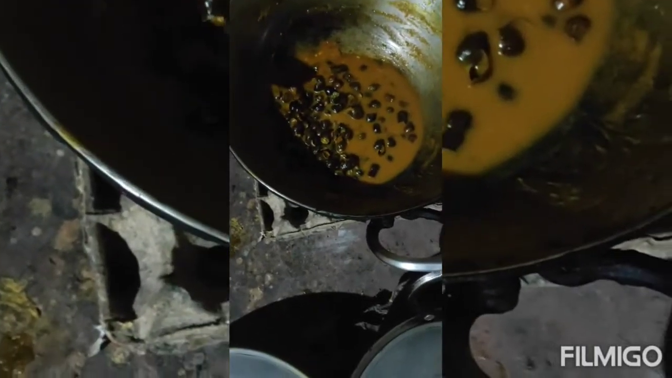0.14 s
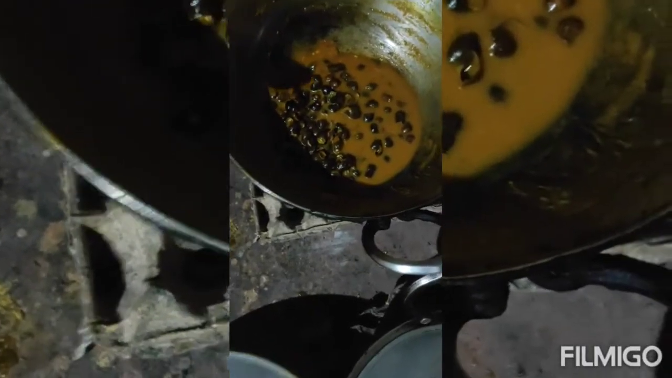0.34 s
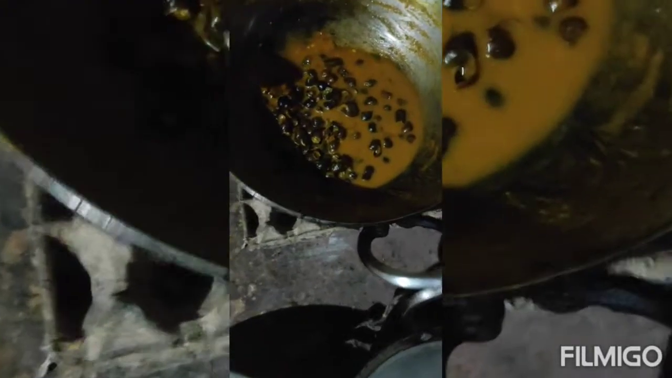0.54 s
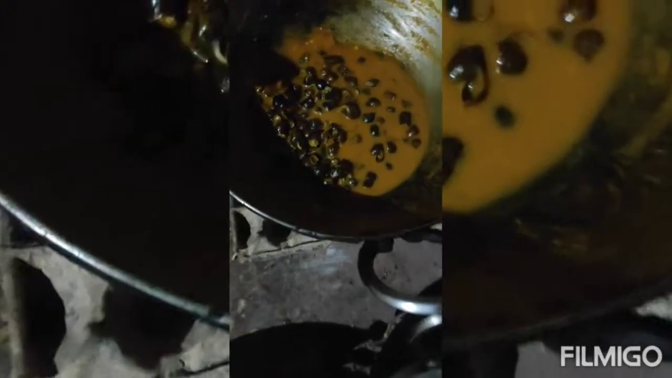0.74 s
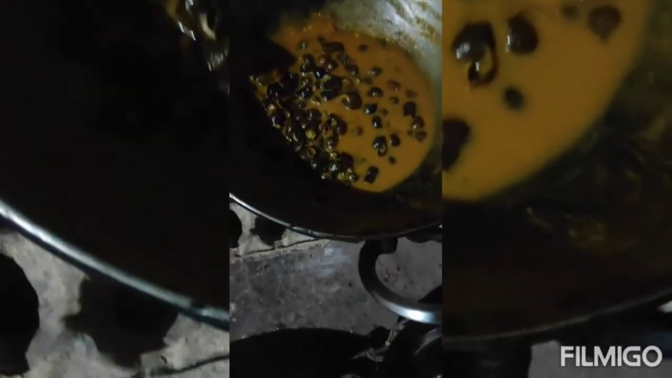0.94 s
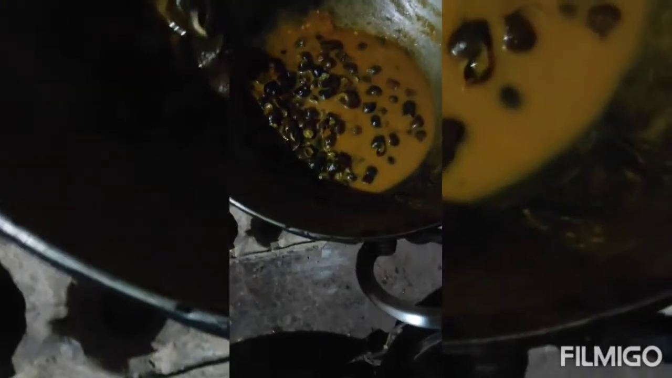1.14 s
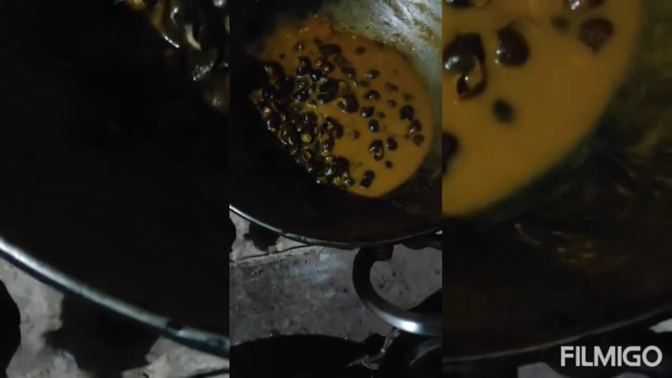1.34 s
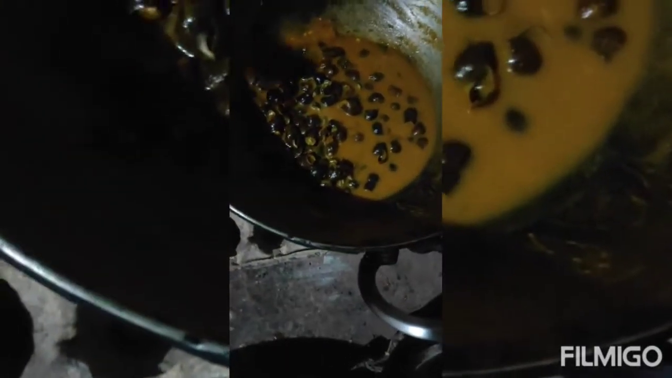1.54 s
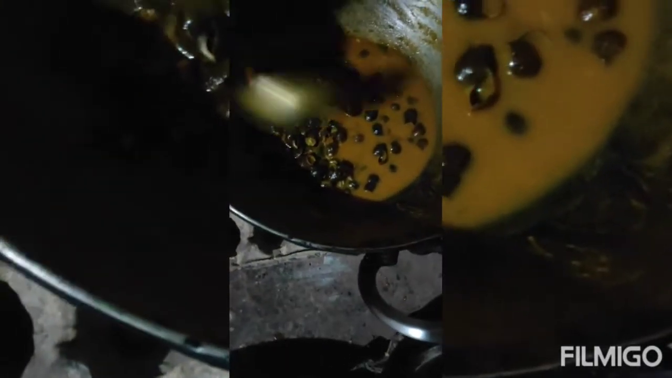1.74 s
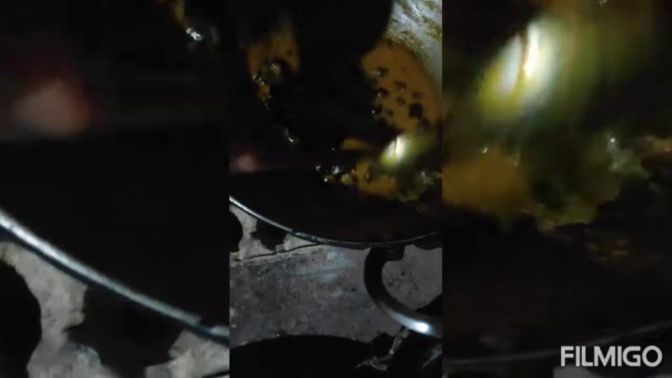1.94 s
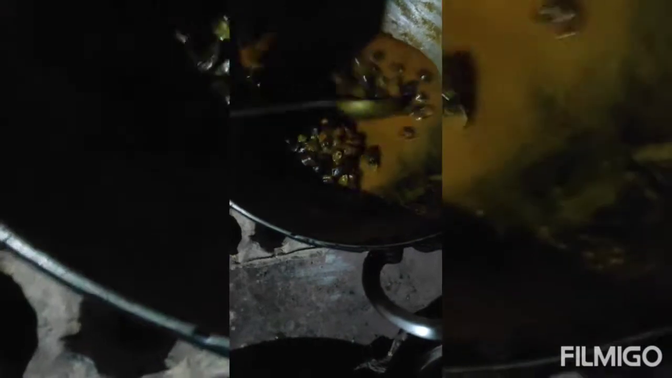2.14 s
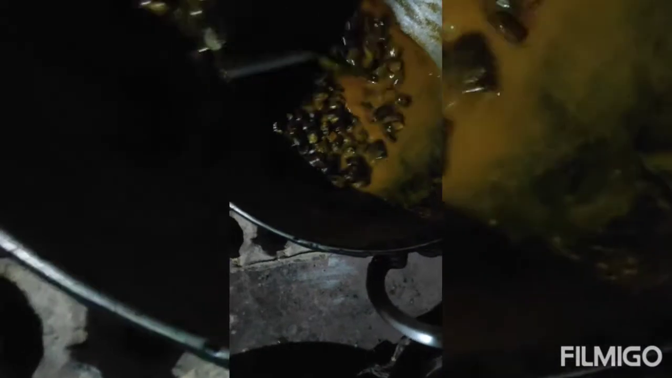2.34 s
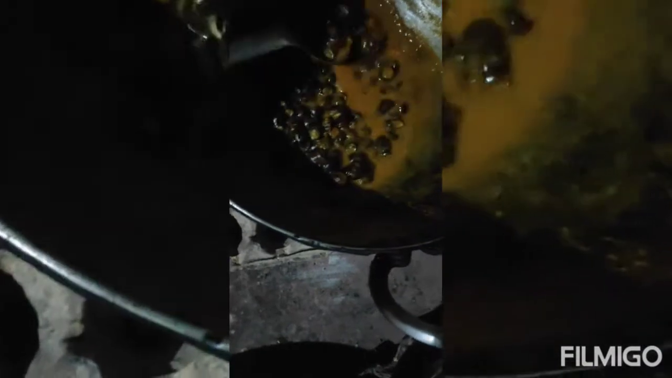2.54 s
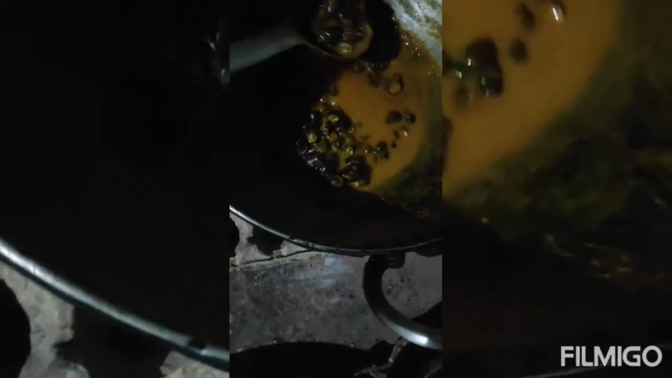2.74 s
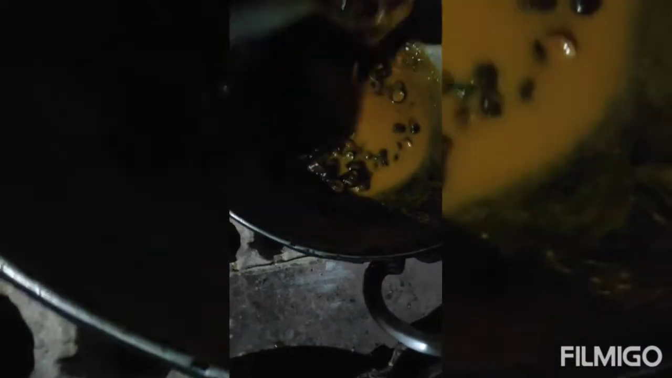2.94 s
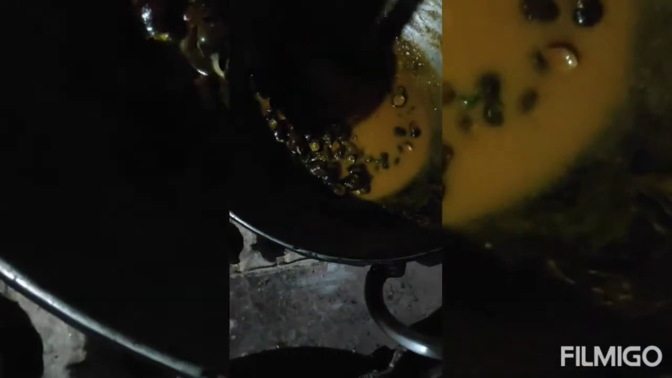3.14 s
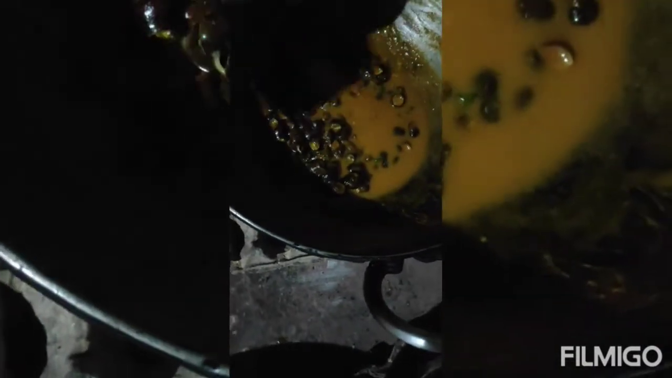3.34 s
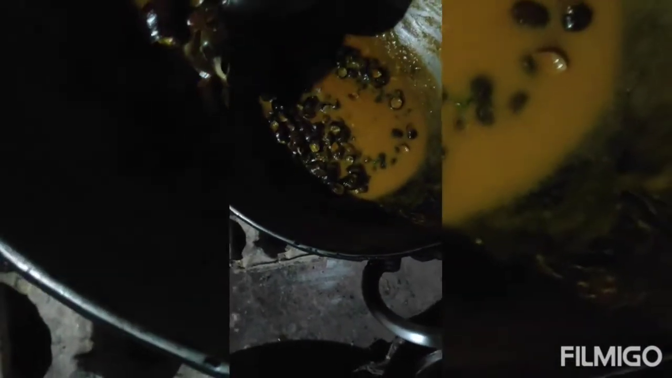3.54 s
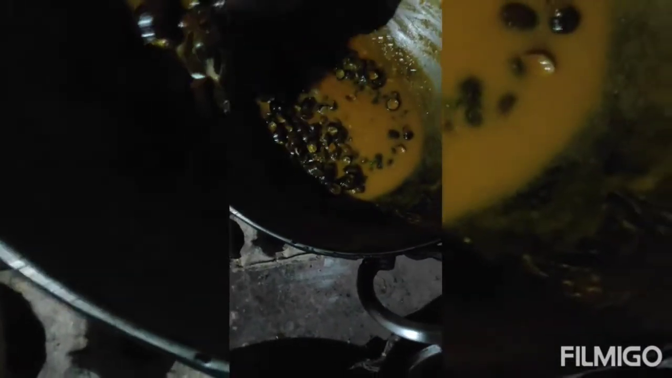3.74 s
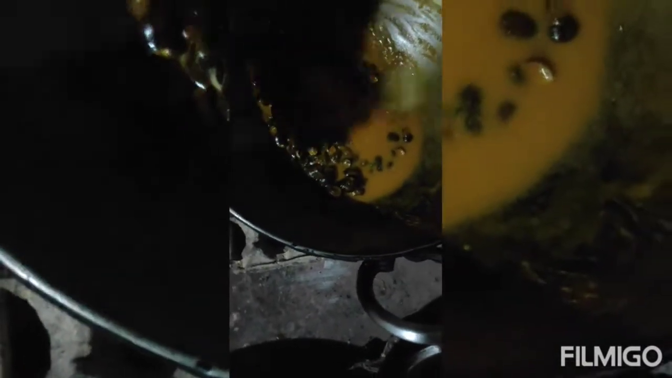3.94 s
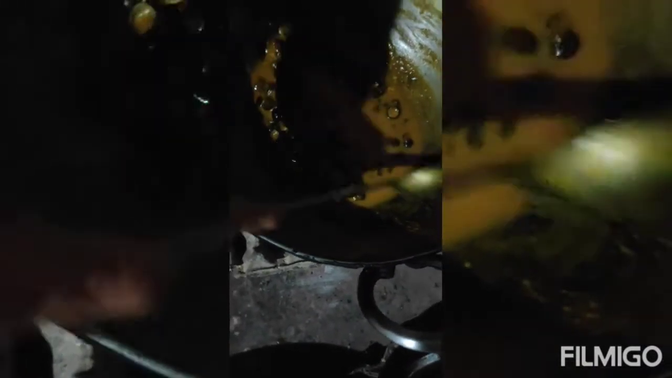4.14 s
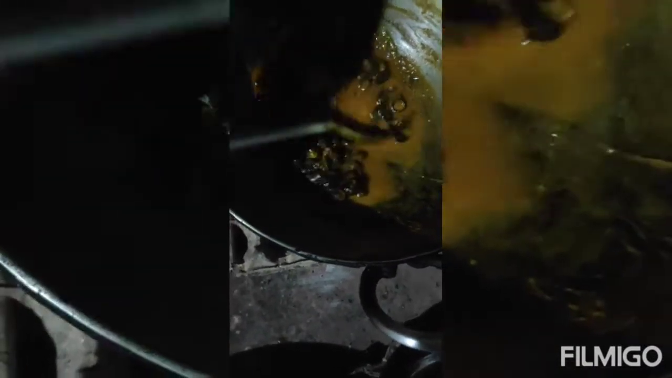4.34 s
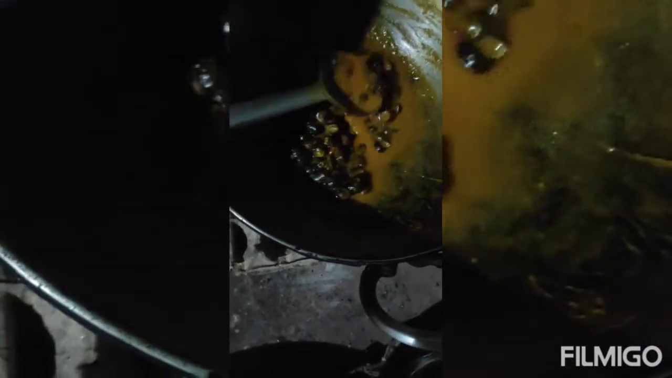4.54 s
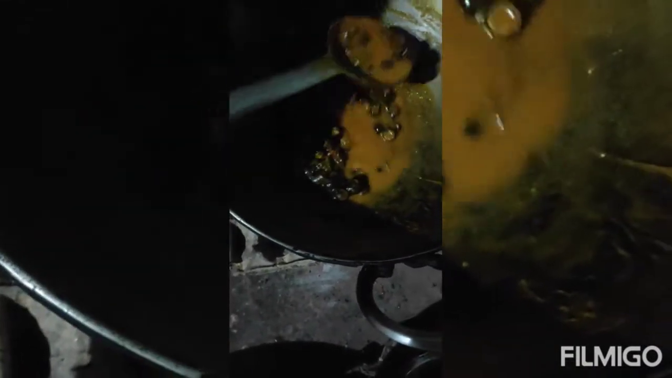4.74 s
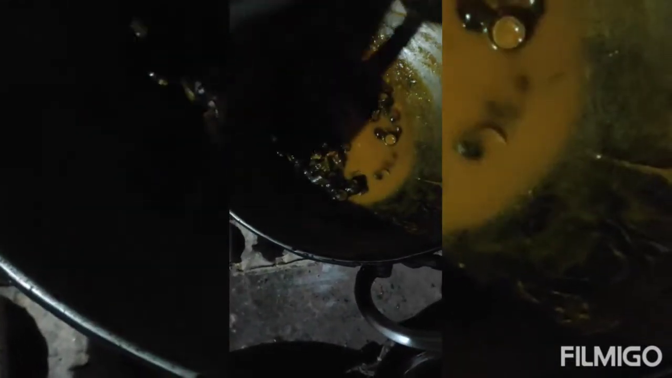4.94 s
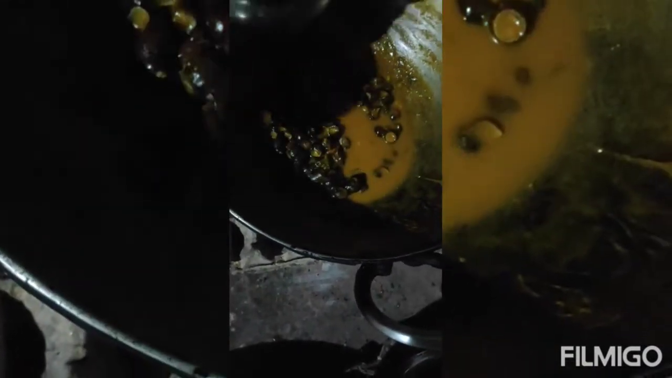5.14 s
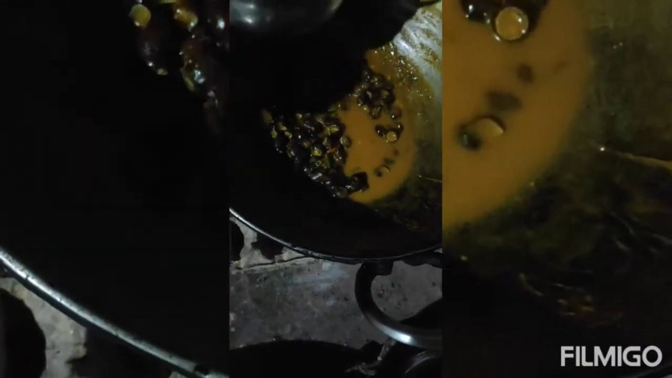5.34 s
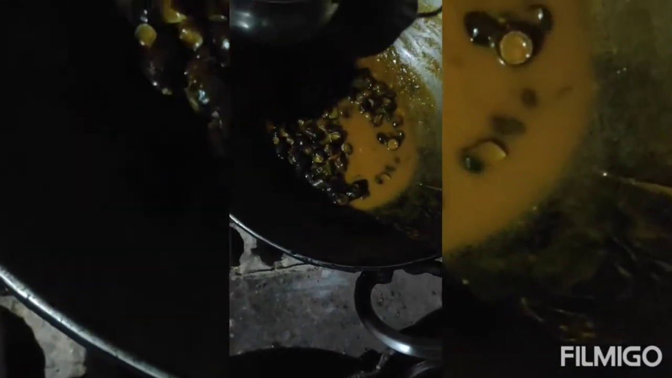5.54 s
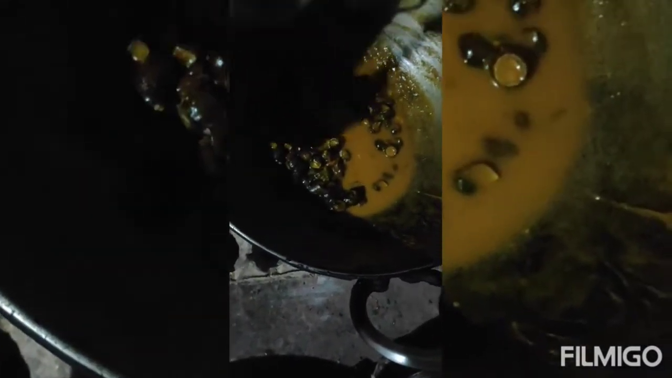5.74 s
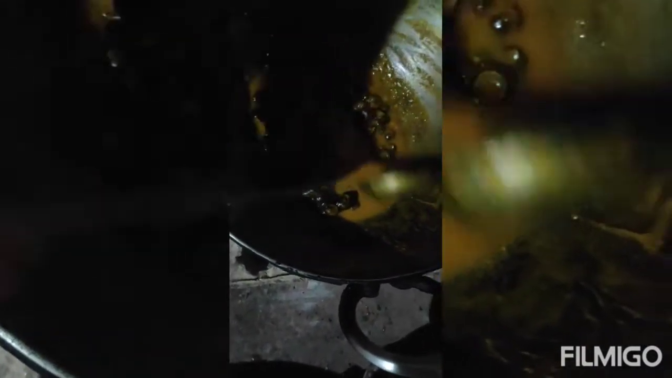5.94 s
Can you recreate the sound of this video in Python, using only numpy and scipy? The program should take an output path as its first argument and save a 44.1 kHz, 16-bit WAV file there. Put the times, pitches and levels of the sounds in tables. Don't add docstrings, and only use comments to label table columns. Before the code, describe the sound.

A metal ladle scrapes and clatters through thick curry in a wide metal pan, two push-and-pull stirs over hissing gas, with distant pot clanks.

```python
import sys
import numpy as np
from scipy import signal
from scipy.fft import rfft, irfft, next_fast_len
from scipy.io import wavfile
from scipy.ndimage import uniform_filter1d

SR = 44100
rng = np.random.default_rng(int(sys.argv[2]) if len(sys.argv) > 2 else 0)


def boost_factor(decibels):
    exponent = np.asarray(decibels, float) / 20
    return 10 ** exponent


def generate_wav(signal):
    frames = np.transpose(np.atleast_2d(signal))
    scaled = np.clip(frames, -1, 1) * 32767
    pcm = np.round(scaled).astype(np.int16)
    wavfile.write(sys.argv[1], SR, pcm)


N = 268128

# (frequency [Hz], density [dB per Hz])
PUSH = [(180, -47.5), (340, -30.5), (488, -9.5), (754, -41), (834, -12), (1270, -22), (1930, -12),
        (3400, -11), (4300, -10), (5200, -11.5), (6200, -5), (7260, -1.5), (8250, -3.5), (9500, -19.5),
        (14900, -29.5), (15700, -25.5), (16500, -70.5)]
TURNS = [
    1.9,
    3.2,
    4.05,
    5.0,
    6.0,
]
# (time [s], peak level [dB], share that rings the wall [dB], struck mode [Hz])
FIRST_PUSH = [(1.9639, -6, -19, 4580), (1.9704, -11, -27, 2424), (1.9818, -4, -16, 880.5),
              (1.9914, -11, -5.5, 475.3), (1.995, -13.5, -1, 850), (1.972, -18, -5.5, 716),
              (2.0445, -17.5, -16.5, 3930), (2.0579, -9.5, -10.5, 3319), (2.066, -6.5, -16, 2427),
              (2.1152, -5.5, -12, 1647), (2.1244, -6, -11.5, 1700), (2.159, -9.5, -14.5, 2866),
              (2.1654, -8.5, -26, 1936), (2.1913, -6.5, -17.5, 2260), (2.2163, -4, -8, 2244),
              (2.305, -13.5, -23.5, 3960), (2.321, -17.5, -5.5, 4010), (2.3377, -16.5, -8.5, 4234),
              (2.3944, -21, -14, 4394), (2.4585, -15, -14, 2960), (2.527, -16.5, -8.5, 4400),
              (2.5548, -12.5, -7, 4300), (2.559, -15.5, -11.5, 4940), (2.582, -19, -5, 4366),
              (2.6336, -19, -8, 3746), (2.711, -13.5, -32, 3740), (2.7774, -15.5, -8.5, 3730),
              (2.7998, -10, -8, 1900), (2.8015, -14, -2, 4000), (2.9788, -11.5, -10, 1860),
              (3.0002, -13, -9, 1880), (3.0508, -21.5, -10.5, 4170)]
# (time [s], peak [dB], wall share [dB], mode [Hz])
FIRST_PULL = [(3.3596, -19, -37.5, 1680), (3.3933, -10.5, -14.5, 4590), (3.4104, -9, -5, 4120),
              (3.454, -13.5, -3, 4120), (3.488, -14, -28, 4200), (3.5324, -8.5, -11.5, 3104),
              (3.536, -15.5, -8.5, 6910), (3.414, -15.5, -5.5, 873), (3.432, -17, -3, 857.5),
              (3.465, -19, -4, 699), (3.65, -20, -7.5, 685.7), (3.5535, -12, -14.5, 662),
              (3.5966, -12.5, -16.5, 682.5), (3.614, -11.5, -9, 2832), (3.6704, -17.5, -16.5, 907),
              (3.9154, -29.5, -28, 1850)]
# (time [s], peak [dB], wall share [dB], mode [Hz])
SECOND_PUSH = [(4.1769, -12.5, -4, 1911), (4.2506, -12, -13, 4030), (4.2724, -12.5, -22.5, 2004),
               (4.3105, -8.5, -13, 1513), (4.315, -14, -9.5, 487.8), (4.3395, -8, -5, 2000),
               (4.3596, -12.5, -4, 1867), (4.4392, -14, -1.5, 2061), (4.4549, -17, -16, 2590),
               (4.5123, -15.5, -27, 4240), (4.5387, -16, -8, 2090), (4.581, -20.5, -2.5, 4434),
               (4.686, -12.5, -6, 1817), (4.702, -21.5, -7.5, 1945), (4.717, -22.5, -12, 1900),
               (4.178, -19, -1, 468)]
# (time [s], peak [dB], wall share [dB], mode [Hz])
SECOND_PULL = [(5.234, -14, -20, 4300), (5.252, -12, -9.5, 3393), (5.278, -24, -32, 4210),
               (5.2913, -10, -16, 3050), (5.3697, -18.5, -3.5, 1300), (5.3866, -14.5, -14.5, 951),
               (5.4019, -16, -6, 1331), (5.435, -13.5, -21.5, 3100), (5.4545, -16.5, -11.5, 1678),
               (5.486, -9.5, -18.5, 3354), (5.503, -13.5, -13, 1650), (5.513, -17, -3, 1029),
               (5.337, -18.5, -8, 1560), (5.312, -20, -2, 878.5), (5.352, -21.5, -3, 874),
               (5.541, -14, -14.5, 3260), (5.8264, -21.5, -20, 4380), (5.8493, -26, -5, 1793)]
BLOWS = FIRST_PUSH + FIRST_PULL + SECOND_PUSH + SECOND_PULL
KNOCK_FIZZ_DB = (-20, -13.5)
PORT_DELAY = 17


def evened(x):
    return x / np.sqrt(np.mean(x ** 2) + 1e-20)


def read(points, hz):
    f, value = np.transpose(points)
    return np.interp(np.log(hz + 1), np.log(f + 1), value)


def add(mix, s, sound):
    part = mix[:, round(s * SR):][:, :sound.shape[1]]
    part += sound[:, :part.shape[1]]


def resonances(modes, hz):
    return sum(boost_factor(db) ** 2 / (1 + ((hz - f) / (width / 2)) ** 2) for f, width, db in modes)


def way(s):
    return (np.searchsorted(TURNS, s) - 1) % 2


def chatter(count=600, ms=3.0):
    shape = (len(BLOWS), count)
    bounces = rng.standard_normal(shape) * (rng.random(shape) < .3)
    bounces[:, 8] = 4.2
    bounces[:, :8] = 0
    bounces = bounces * np.exp(-(np.arange(count) / SR / (.001 * ms)) ** 2.2)
    return 6.876 * bounces / np.linalg.norm(bounces, axis=1, keepdims=True)


def friction():
    grains = rng.standard_normal(N) * boost_factor(3.1 * np.minimum(rng.exponential(1, N), 3.1))
    grains = grains * (rng.random(N) < 4500 / SR)
    roughness = evened(uniform_filter1d(rng.standard_normal(N), 200))
    return evened(grains * boost_factor(1.3 * roughness))


def ladle_force(bursts):
    # (start [s], length [s], pressure [dB], change by the end [dB], depth in the bowl [dB])
    strokes = [(1.96, 0.0682, -14, -11.5, -18), (2.033, 0.2067, -21.5, 1.5, -19.5),
               (2.229, 0.08, -25.5, -11.5, -16), (2.303, 0.0983, -22.5, -2.5, -19.5),
               (2.418, 0.2727, -30.5, -3, -24.5), (2.709, 0.051, -27, -20.5, -15),
               (2.797, 0.046, -28.5, -12.5, -12), (2.984, 0.07, -31, -20.5, -29),
               (3.376, 0.03, -38, 5.5, -28.5), (3.406, 0.1063, -19.5, -5, -13),
               (3.53, 0.126, -25.5, -0.5, -20), (3.651, 0.075, -27.5, -20, -15.5),
               (3.908, 0.085, -35.5, -18, -12.5), (4.17, 0.074, -24, -9.5, -15.5),
               (4.248, .11, -18, -1, -22), (4.355, 0.2036, -17.5, -14, -24.5),
               (4.561, 0.0886, -35.5, -5.5, -19), (4.686, 0.0715, -33, -28.5, -17.5),
               (5.233, 0.067, -25.5, 5.5, -20.5), (5.298, 0.166, -24, -16, -14),
               (5.481, 0.1796, -21, -17, -23), (5.663, 0.029, -27, -19, -17.5)]
    slide_wall_db, slide_fizz_db = (-10.5, -11), (-16.5, -9.5)
    knock_hum_db = (-25.5, -21.5)
    hum_share = .6
    grip_s = 0.0036
    fizz_per_db, firm_db = 0.79, -13.5
    follow = np.array([[1], [.7], [0.878], [1.3]])
    grit = friction()
    force = np.zeros((4, N))
    for s, length, db, change_db, depth_db in strokes:
        t = np.arange(0, length, 1 / SR)
        parts_db = np.array([[0], [depth_db], [slide_wall_db[way(s)]], [slide_fizz_db[way(s)]]])
        pressure_db = db - 1.5 + parts_db + follow * change_db * t / length
        add(force, s, np.minimum(t / grip_s, 1) * boost_factor(pressure_db))
    force *= grit
    for (s, db, ring, hz), burst in zip(BLOWS, bursts):
        hum_db = knock_hum_db[way(s)] + hum_share * ring
        fizz_db = KNOCK_FIZZ_DB[way(s)] + fizz_per_db * (db - firm_db)
        parts_db = np.array([[0], [hum_db], [ring - 3.5], [fizz_db]])
        add(force, s - .001, burst * boost_factor(db + 0.5743 + parts_db))
    return force


def pan_rings(colour, strong, count=500, spots=8, size=2200):
    # (frequency [Hz], t60 [s])
    damping = [(400, 0.06), (2000, .035), (7000, 0.016), (14000, 0.0076)]
    parts_hz = (150, 1200, 4000, 9500, 16500)
    shift_rad, overlap = .6, .12
    dense_hz = np.linspace(300, 16500, num=count) + rng.uniform(-15, 15, count)
    hz = np.r_[dense_hz, [m[0] for m in strong]]
    t60 = np.r_[read(damping, dense_hz) * rng.uniform(.5, 1.6, count), [2.2 / m[1] for m in strong]]
    boost_db = np.r_[np.zeros(count), [m[2] for m in strong]]
    height = boost_factor(read(colour, hz) + boost_db) / np.sqrt(t60)
    t = np.arange(size) / SR
    modes = height[:, None] * np.exp(np.outer(2j * np.pi * hz - np.log(1000) / t60, t))
    near = np.exp(2j * np.pi * rng.random((spots, len(hz))))
    near[:, count:] = np.exp(1j * np.pi * np.arange(spots)[:, None] / 2)
    lag_rad = 2 * np.pi * hz * np.minimum(hz / 1100, 1) * 0.0003945
    patch_rad = np.minimum(hz / 900, 2.5) * rng.standard_normal(len(hz))
    far = near * np.exp(1j * (patch_rad - lag_rad))
    far = far * np.exp(1j * shift_rad * np.minimum(hz / 2000, 1) * rng.standard_normal(near.shape))
    blurred_hz = hz * np.exp(overlap * (hz < 6500) * rng.standard_normal(len(hz)))
    part = np.digitize(np.clip(blurred_hz, parts_hz[0], parts_hz[-1] - 1), parts_hz)
    body_hum_wall_fizz = (3, 1, 2, 4)
    rings = np.array([[((w * (part == k)) @ modes).imag for w in (far, near)] for k in body_hum_wall_fizz])
    rings *= 1 - np.exp(-t / 0.00064)
    return (rings / np.linalg.norm(rings, axis=-1, keepdims=True)).transpose(2, 0, 1, 3)


def pan(force, rings, dwell_s=.022):
    size = next_fast_len(force.shape[1] + rings.shape[-1])
    travel = np.arange(force.shape[1]) / SR / dwell_s
    out = 0
    for k, spot in enumerate(rings):
        away = (travel - k + len(rings) / 2) % len(rings) - len(rings) / 2
        share = np.cos(np.pi / 2 * np.clip(away, -1, 1))
        out = out + (rfft(force * share, size)[:, None] * rfft(spot, size)).sum(0)
    return irfft(out, size)


def struck_mode(burst, t, t60, hz, db):
    mode = boost_factor(-60 * t / t60) * np.sin(2 * np.pi * hz * t)
    ping = np.convolve(burst, mode)
    ping *= boost_factor(db) / abs(ping).max()
    return np.array([np.roll(ping, PORT_DELAY), ping])


def pings(bursts, t60=0.033):
    out, t = np.zeros((2, N)), np.arange(2000) / SR
    for (s, db, ring, hz), burst in zip(BLOWS, bursts):
        mode_t60 = t60 / (hz / 2500) ** .5
        add(out, s - .001, struck_mode(burst, t, mode_t60, hz, db + ring - 5.0))
    return out


def ticks(bursts):
    # (time [s], peak level [dB], treble mode
    # [Hz])
    catches = [(1.9709, -1.5, 7075), (1.9902, -3, 8310), (2.04, -13.5, 7540), (2.065, -7.5, 7860),
               (2.0803, -7.5, 7360), (2.0846, -12.5, 8200), (2.1005, -13.5, 7190), (2.125, -5.5, 6520),
               (2.1286, -13, 7540), (2.1329, -12.5, 7390), (2.1663, -8, 6780), (2.1703, -5.5, 6860),
               (2.202, -16, 7480), (2.2115, -10, 7830), (2.2154, -1, 6600), (2.2629, -21.5, 7070),
               (2.3049, -6, 7290), (2.3515, -10, 7130), (2.3727, -13, 7084), (2.4773, -17, 7460),
               (2.502, -15, 6000), (2.5166, -16, 5250), (2.5954, -13.5, 7595), (2.6269, -24, 7520),
               (2.7937, -9, 7140), (3.0118, -18, 7690), (3.4661, -11.5, 7320), (3.5913, -14, 7600),
               (3.5971, -8.5, 7750), (3.6053, -13, 5780), (3.6351, -13.5, 7390), (3.646, -14.5, 7140),
               (3.774, -24.5, 7160), (3.9239, -22, 8600), (4.1896, -15, 5600), (4.1996, -24, 7660),
               (4.2462, -16, 7320), (4.2544, -4.5, 8220), (4.2716, -8.5, 7680), (4.2881, -9, 7840),
               (4.3245, -12, 6510), (4.3397, -9.5, 6500), (4.3525, -10.5, 7400), (4.3592, -13, 7160),
               (4.3966, -10.5, 6980), (4.4113, -16, 7200), (4.4517, -16.5, 7140), (4.5906, -21.5, 7220),
               (4.6014, -21, 7500), (4.6091, -24, 7280), (4.655, -23.5, 7260), (4.694, -15.5, 7700),
               (4.7069, -20.5, 7100), (5.4748, -23.5, 7680), (5.4942, -11, 7090), (5.5081, -13.5, 7130),
               (5.5524, -13, 8560), (5.6012, -15, 6970), (5.64, -29, 7040), (5.6772, -25, 7290),
               (2.1145, -6, 8400), (2.3215, -14, 5200), (2.3456, -16, 7800), (2.4423, -19, 6770),
             (2.4577, -6, 5000), (2.4605, -13, 7450), (2.4992, -16, 5000), (2.5257, -19, 8190),
             (2.5585, -13, 8200), (2.582, -14, 7690), (2.6628, -22, 7640), (2.7117, -10, 7600),
             (2.7766, -11, 7480), (2.9788, -9, 8500), (3.0002, -8, 7500), (3.3965, -8, 7180),
             (3.4125, -7, 7470), (3.4541, -13, 8560), (3.489, -13, 7220), (3.5309, -8, 6860),
             (3.6681, -12, 7250), (4.1758, -9, 5630), (4.2725, -3.5, 7880), (4.4385, -11, 7880),
             (4.5126, -12, 7520), (4.6855, -12, 7500), (4.6885, -8, 6000), (5.2173, -23, 7800),
             (5.2328, -4.5, 8700), (5.2767, -11, 6790), (5.2892, -8, 8260), (5.3231, -16, 7260),
             (5.336, -19, 8200), (5.368, -11, 7860), (5.4019, -13, 7660), (5.4345, -8, 6210),
             (5.4847, -4, 8620), (5.5015, -11, 7200), (5.6648, -24, 7160), (5.555, -14, 7400),
             (5.8264, -20, 7300)]
    catch_s, mode_t60 = 0.0017, .012
    force, out, t = np.zeros((4, N)), np.zeros((2, N)), np.arange(600) / SR
    for k, (s, db, hz) in enumerate(catches):
        burst = bursts[k % len(bursts)] * np.exp(-t / catch_s)
        parts_db = np.array([[-3.0], [-36], [-15], [KNOCK_FIZZ_DB[way(s)] - 2.5]])
        add(force, s, burst * boost_factor(db + parts_db))
        add(out, s, struck_mode(burst, t, mode_t60, hz, db - 7.0))
    return force, out


def stirred_pan():
    # (frequency [Hz], density [dB per Hz])
    pull = [(180, -60), (300, -33), (587, -32), (649, -18.5), (877, -5), (1060, -14.5), (2650, -18.5),
            (3140, -16), (3840, -12.5), (5500, -7), (7020, 4.5), (8580, 3.5), (10300, -8), (15200, -12),
            (16500, -33.5)]
    # (frequency [Hz], width [Hz], level [dB])
    push_modes = [(213.7, 81, 18.5), (447, 55, 9), (489.6, 70, 6.5), (850, 70, 5.5), (1509.6, 140, 13),
                  (1880, 190, 14), (2131.3, 100, 7)]
    # (frequency [Hz], width [Hz], level [dB])
    pull_modes = [(655.4, 70, 4.6), (870.3, 100, 3), (1012.5, 58, 3), (1700, 39, 4.9), (3120, 60, 2.8)]
    # (time [s], left over right [dB])
    swing = [(2.2, 2.5), (2.4, -2.5), (3.0, 0), (3.6, -0.5), (4.3, 3.5), (4.7, -1.13), (5.398, 1.94),
             (5.5, 3.5)]
    bursts = chatter()
    catch_force, catch_rings = ticks(bursts)
    ladle = pings(bursts) + catch_rings
    force = ladle_force(bursts) + catch_force
    ways = pan_rings(PUSH, push_modes), pan_rings(pull, pull_modes)
    for k, (start, end) in enumerate(zip(TURNS, TURNS[1:])):
        add(ladle, start, pan(force[:, round(start * SR):round(end * SR)], ways[k % 2]))
    ladle = signal.lfilter(*signal.butter(2, 170, "high", fs=SR), ladle)
    swing_db = np.interp(np.arange(N) / SR, *np.transpose(swing))
    return ladle * boost_factor(np.array([swing_db, -swing_db]) / 2)


def kitchen(x):
    # (frequency [Hz], t60 [s])
    room_decay = [(300, 0.23), (2000, 0.36), (7000, 0.27), (14000, 0.11)]
    taps = np.zeros((2, SR // 2))
    slots = np.arange(260, SR // 2 - 20, 20)
    at = slots + rng.integers(0, 20, (2, len(slots)))
    np.put_along_axis(taps, at, rng.choice([-1., 1.], at.shape), 1)
    hz, t, z = signal.stft(taps, SR, nperseg=128)
    decay = boost_factor(-60 * t / read(room_decay, hz)[:, None])
    tail = signal.istft(z * decay, SR, nperseg=128)[1]
    return signal.fftconvolve(x, tail / np.linalg.norm(tail[0]), axes=1)[:, :N]


def clank(s, db, t60, modes):
    size = 2 ** 15
    hz, t = np.fft.rfftfreq(size, 1 / SR), np.arange(size) / SR
    wide = boost_factor(read(PUSH, hz) - 9.5) ** 2 / (1 + (hz / 8800) ** 12)
    power = uniform_filter1d(resonances(modes, hz), 28) + wide
    lines = rfft(rng.standard_normal((2, size))) * np.sqrt(power)
    lows = hz < 3500
    noise = irfft(lines * ~lows) + irfft(lines * lows) * boost_factor(60 * t / t60 * 0.22)
    return s, boost_factor(db - 60 * t / t60) * (1 - np.exp(-t / 0.0035)) * noise / irfft(lines).std()


def far_pots():
    # (time [s], level [dB], t60 [s])
    strikes = [
        (.005, -29.5, 0.5),
        (.505, -35.5, .8),
        (0.739, -34.5, 0.0153),
        (1.112, -20.5, 0.3417),
        (1.727, -40.5, 0.24),
        (5.743, -36.5, 0.46),
        (6.037, -35.5, 9),
    ]
    # (frequency [Hz], width [Hz], level [dB])
    pots = [
        [(2492.5, 60, -4.5), (4140, 90, -10), (5320, 220, -12.5), (6743, 22, 0.5), (7824, 250, 0)],
        [(1118, 86, -7.5), (1300, 67, -4.5), (1880, 50, -1), (2090, 50, -3), (7190, 190, -7)],
        [(5960, 32, -3), (7750, 70, -9.5)],
        [(2514, 50, 1.5), (2620, 100, 2.5), (2960, 18, 1.5), (3313, 16, -1), (1299, 64, -8.5), (4120, 60, -11),
         (5243, 200, -6), (5620, 260, -5), (6500, 300, -13), (7850, 160, -3), (8250, 160, -5), (1900, 135, -12)],
        [(7050, 86, 4), (8200, 34, 1.7)],
        [(1020, 170, -0.5), (1250, 63, 6.5), (2156, 190, -3), (2617, 100, -3)],
        [(2042, 48, 4), (4840, 135, -5.5), (7760, 71, 5.5), (9030, 32, 5.5)],
    ]
    out = np.zeros((2, N))
    for row, modes in zip(strikes, pots):
        add(out, *clank(*row, modes))
    return out


def burner():
    # (frequency [Hz], coherence [0..1])
    hiss_same = [(60, 1), (290, 0.71), (700, 0.27), (1500, 0.045)]
    # (frequency [Hz], density [dB per Hz])
    hiss = [(70, -18), (100, -12), (125, -8.5), (200, -5.5), (265, -14.5), (510, -10.5), (1100, -11.5),
            (2400, -12.5), (4100, -18.5), (6000, -16.5), (7300, -5.5), (8300, -9), (10000, -25.5),
            (16500, -32)]
    # (frequency [Hz], width [Hz], level [dB])
    rumble = [
        (35.27, 7, 8),
        (59.48, 5.5, 3),
    ]
    hiss_db = -43
    frames, hz = N // 1024 + 5, np.fft.rfftfreq(4096, 1 / SR)
    a, b, c, d, patches = rng.standard_normal((frames, 2049, 5)).T
    patches = evened(uniform_filter1d(uniform_filter1d(patches, 48, 0), 4, 1))
    swell = evened(uniform_filter1d(rng.standard_normal(frames), 8))
    same = np.clip(read(hiss_same, hz), 0, 1)[:, None]
    left = a + 1j * b
    z = np.array([left, same * left + np.sqrt(1 - same ** 2) * (c + 1j * d)])
    engines = resonances(rumble, hz) * hz ** 2 / (hz ** 2 + 400)
    colour = np.sqrt(boost_factor(read(hiss, hz)) ** 2 + engines)
    z *= colour[:, None] * boost_factor(1.2 * patches + 0.68 * swell)
    return boost_factor(hiss_db + 2.5) * evened(signal.istft(z, nperseg=4096, noverlap=3072)[1][:, :N])


def scene():
    ladle = stirred_pan()
    return ladle + boost_factor(-10.0) * kitchen(ladle) + far_pots() + burner()


def fold(size):
    n, k = np.arange(2 * size)[:, None], np.arange(size)
    bell = np.cumsum(np.kaiser(size + 1, 4 * np.pi))
    rise = np.sqrt(bell[:size] / bell[-1])
    window = np.r_[rise, rise[::-1]][:, None]
    return window * np.cos(np.pi / size * (n + .5 + size / 2) * (k + .5)) * np.sqrt(2 / size)


def starved(x, size=1024, count=263):
    # (frequency [Hz], step [dB])
    coarse = [(700, -6), (1500, -2), (3500, 0), (5700, .5), (7300, -5), (8600, 2), (9600, 7.5), (11500, 5),
              (15300, 3), (16000, 28)]
    turn = fold(size)
    pair = np.array([x[0] + x[1], x[0] - x[1]]) / 2
    pair = np.pad(pair, ((0, 0), (2 * size - count, 3 * size)))
    halves = pair[:, :pair.shape[1] // size * size].reshape(2, -1, size)
    frames = np.concatenate([halves[:, :-1], halves[:, 1:]], axis=2)
    lines = frames @ turn
    local = np.sqrt(uniform_filter1d((lines ** 2).sum(0), 30, 1) + 1e-14)
    whim = uniform_filter1d(rng.standard_normal((len(local), 64)), 2, 0)
    whim[:, 25::2] = whim[:, 24::2]
    whim = np.repeat(whim, 16, axis=1)
    power = (frames[0] ** 2).reshape(len(local), 16, -1).mean(2) + 1e-12
    rise = (power[:, 1:] / power[:, :-1]).max(1)[:, None]
    relief_db = 14 * (rise > 12) + 16 * (rise > 60)
    hz = np.arange(size) * SR / 2 / size
    busy_db = np.maximum(10 * np.log10(power.mean(1)) + 41, 0)[:, None]
    whim_db = np.where(hz > 8500, 7.5, hz / 850) * whim
    step_db = read(coarse, hz) + whim_db - relief_db + 90 * (hz > 16900)
    treble_db = (hz > 8500) * (0.11 * busy_db + np.array([[[0]], [[5.5]]]))
    step = local * boost_factor(step_db + treble_db)
    rounded = np.sign(lines) * np.floor(abs(lines) / step + .4) * step
    frames = rounded @ turn.T
    joined = (frames[:, 1:, :size] + frames[:, :-1, size:]).reshape(2, -1)
    mid, side = joined[:, size - count:][:, :N]
    return np.array([mid + side, mid - side])


def band_limit(x):
    return signal.sosfilt(signal.butter(12, 16990, fs=SR, output="sos"), x)


def record(dry):
    # (frequency [Hz], share [0..1])
    shared_treble = [(5800, 0.025), (7000, 0.908), (8300, 0.56), (9100, 0.28)]
    # (frequency [Hz], left over right [dB])
    port_lean = [(40, 5.5), (250, 4.5), (900, 3.5), (3000, -1.5), (5500, -5), (6900, -8.5), (8300, -0.5),
                 (16000, -8)]
    hz = np.fft.rfftfreq(N, 1 / SR)
    left, right = rfft(dry)
    joined = np.clip(read(shared_treble, hz), 0, 1)
    left = joined * right + np.sqrt(1 - joined ** 2) * left
    lean = boost_factor(read(port_lean, hz) / 2)
    ports = irfft(np.array([left * lean, right / lean]), N)
    mix = starved(1.284 * np.tanh(ports / 1.346))
    return band_limit(mix)


dry = scene()
out = record(dry)
generate_wav(out)
```